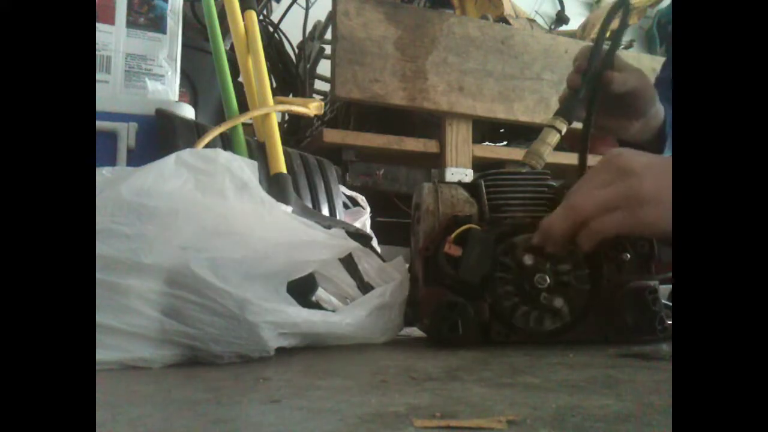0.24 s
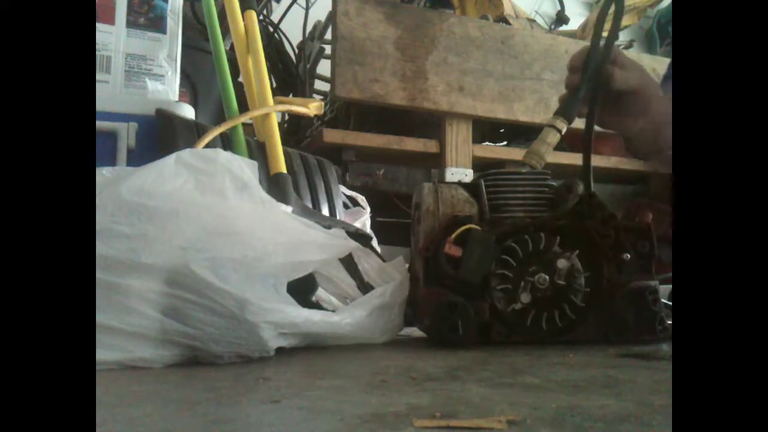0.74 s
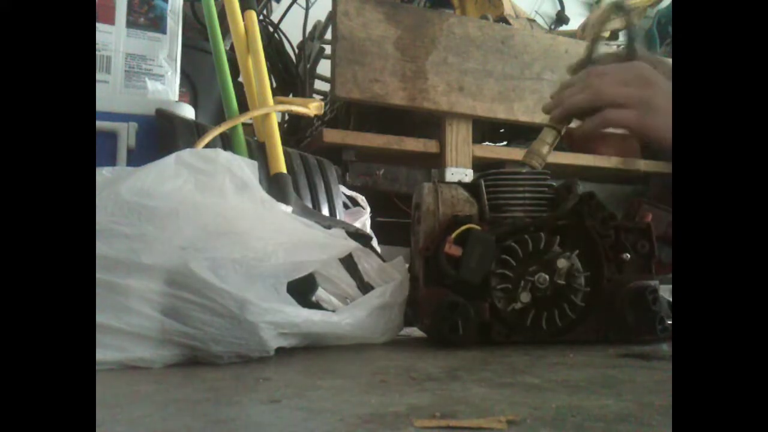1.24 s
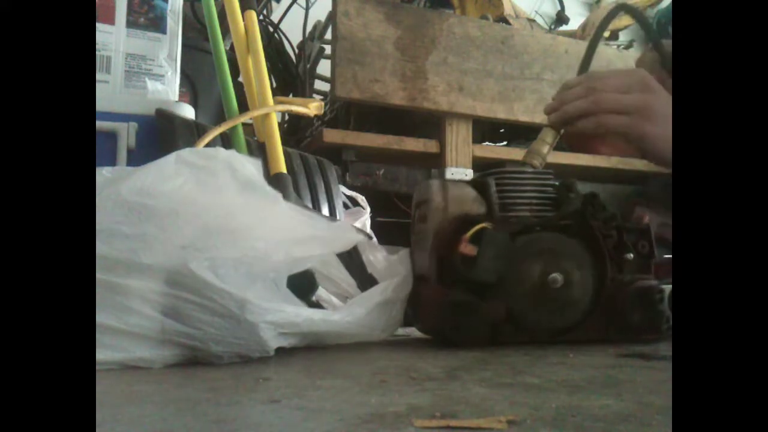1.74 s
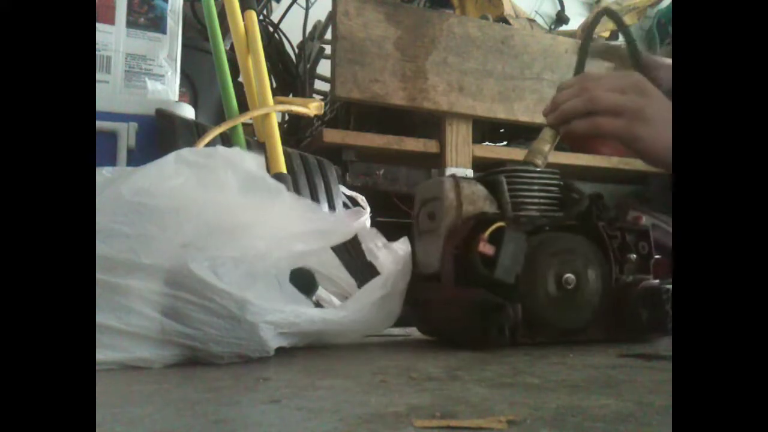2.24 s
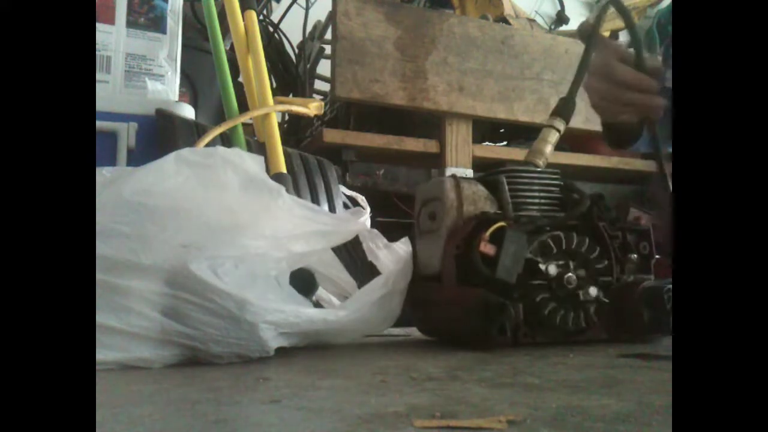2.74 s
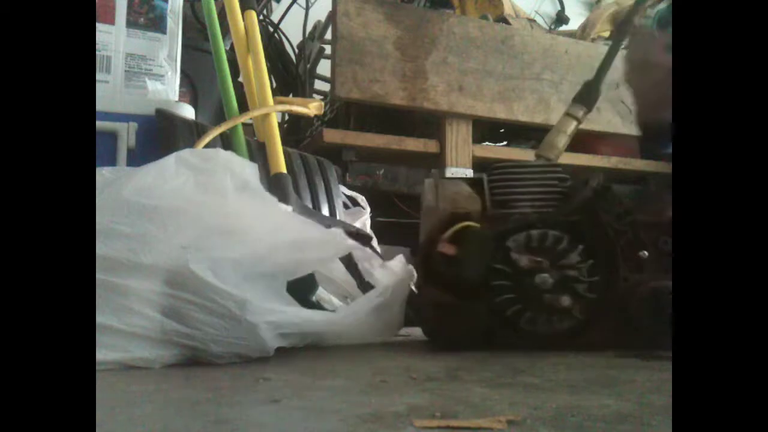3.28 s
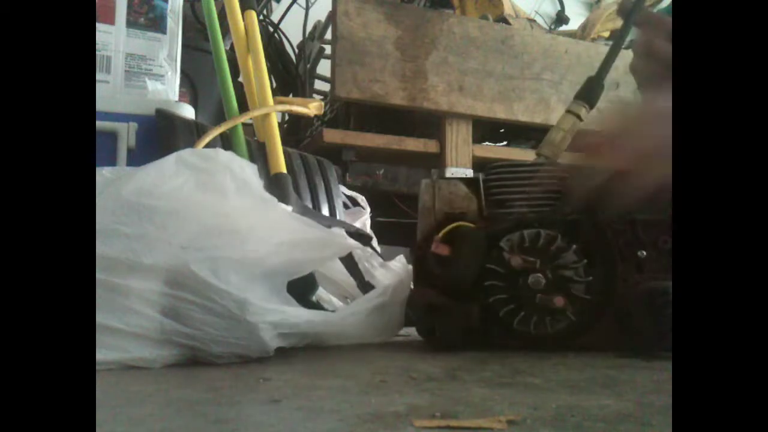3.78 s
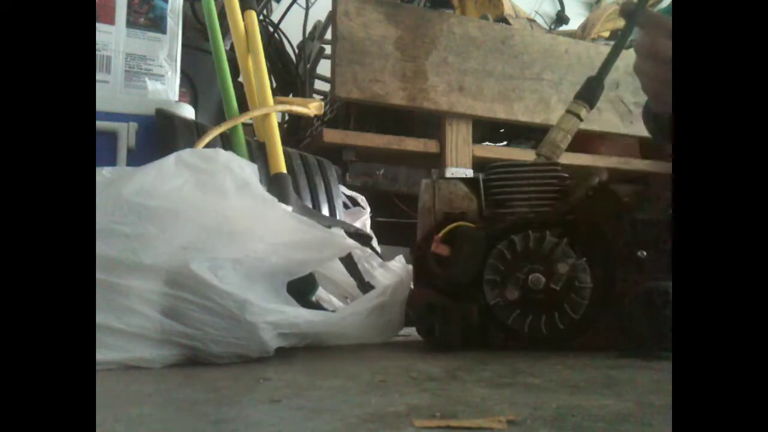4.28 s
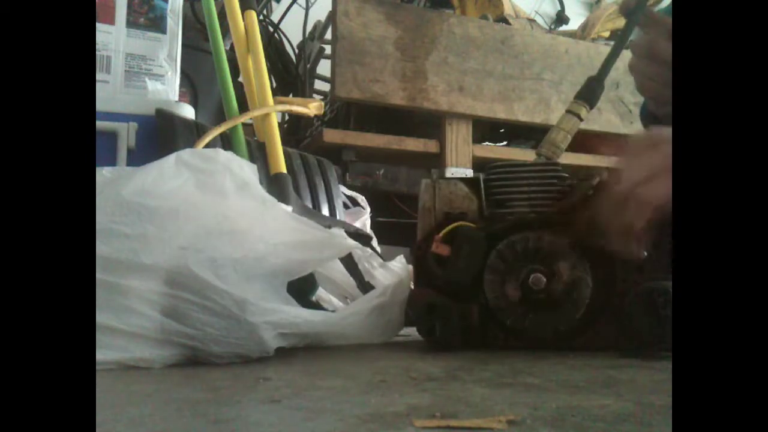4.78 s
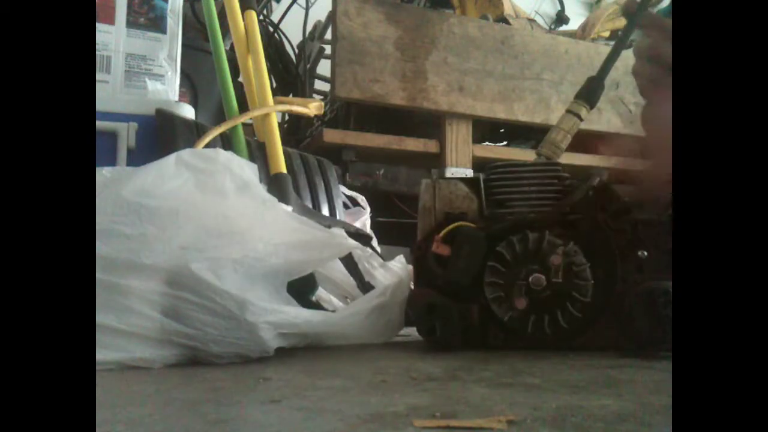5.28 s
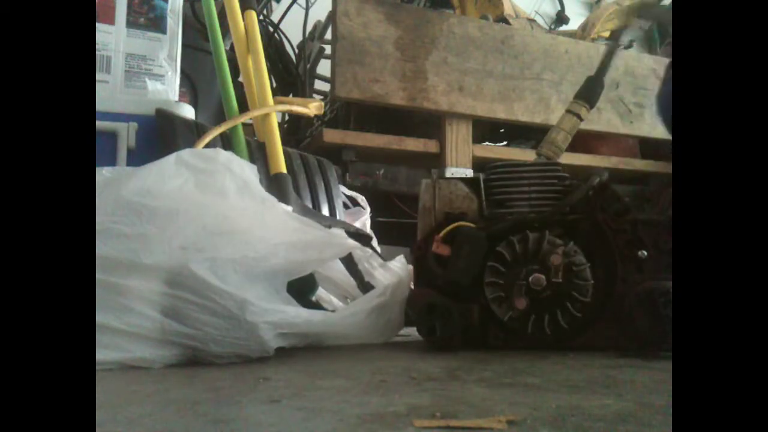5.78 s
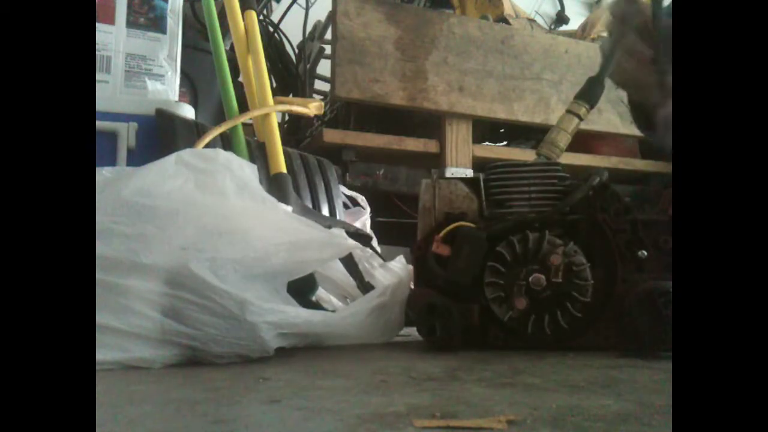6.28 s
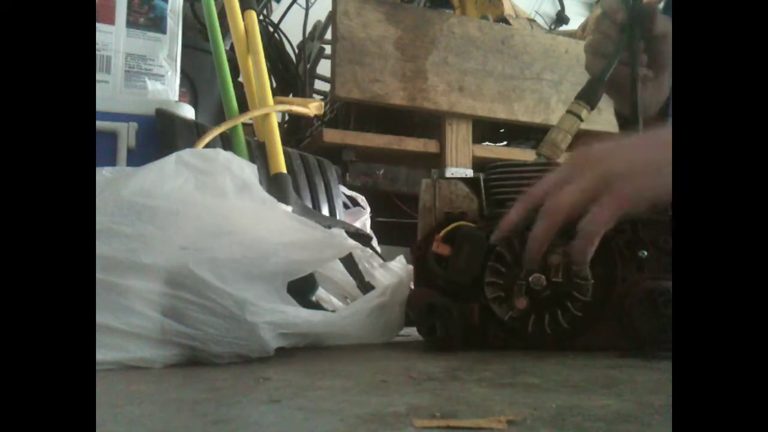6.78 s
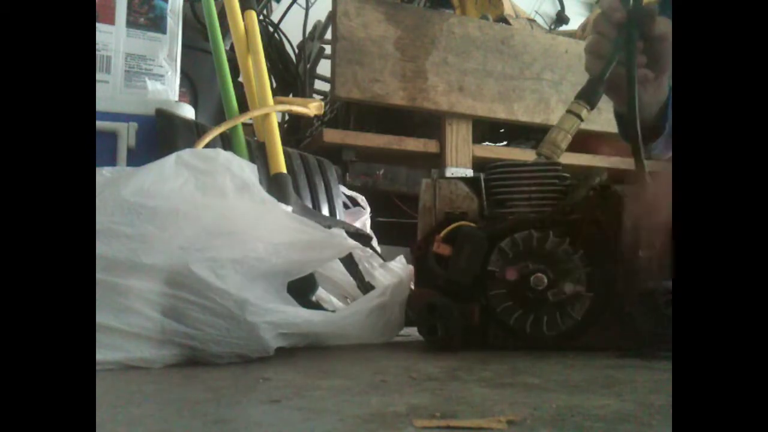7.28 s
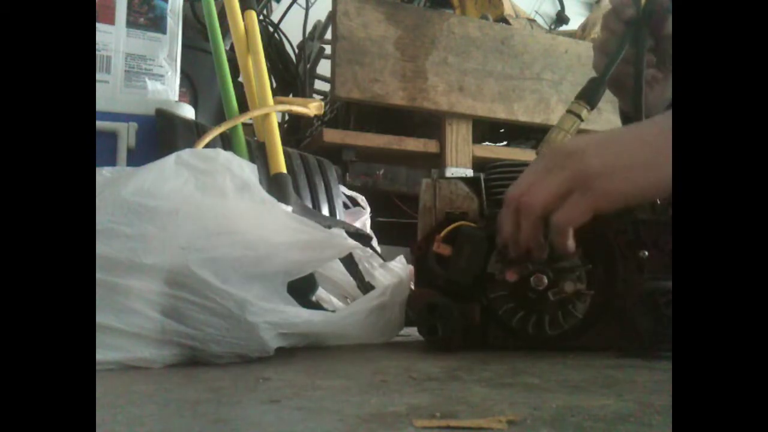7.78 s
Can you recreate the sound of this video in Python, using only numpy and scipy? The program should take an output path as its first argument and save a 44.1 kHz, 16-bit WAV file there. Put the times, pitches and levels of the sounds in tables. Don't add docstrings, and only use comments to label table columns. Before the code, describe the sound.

Compressed air spins a small engine in rapid chuffing puffs that clatter on the floor and stall, then long hissing gusts, flicks and metallic pings.

```python
import sys
import numpy as np
from scipy import signal
from scipy.fft import rfft, irfft, next_fast_len
from scipy.io import wavfile
from scipy.ndimage import uniform_filter1d

SR = 44100
rng = np.random.default_rng(int(sys.argv[2]) if len(sys.argv) > 2 else 0)


def generate_wav(sig):
    pcm = np.round(np.clip(np.atleast_2d(sig).T, -1, 1) * 32767).astype(np.int16)
    wavfile.write(sys.argv[1], SR, pcm)


def undo_db(level):
    steps = np.asarray(level, float) / 20
    return 10 ** steps


N = 354123
TIME = np.arange(N) / SR
HZ = np.fft.rfftfreq(next_fast_len(N), 1 / SR) + 1e-3


def unit(x):
    return x / np.sqrt(np.mean(x ** 2))


def colour(points):
    hz, db = np.transpose(points)
    return undo_db(np.interp(np.log(HZ), np.log(hz), db))


def above(hz, steep=6):
    return 1 / np.sqrt(1 + (hz / HZ) ** steep)


def below(hz, steep=6):
    return np.sqrt(1 - above(hz, steep) ** 2)


def noise(gain):
    size = next_fast_len(N)
    return unit(irfft(rfft(rng.standard_normal(size)) * gain, size)[:N])


def hiss_burst(t):
    return rng.standard_normal(len(t))


def band(x, hz, q):
    return signal.lfilter(*signal.iirpeak(min(hz, .45 * SR), q, fs=SR), x)


def walk(rate, count=N):
    hold = int(SR / rate)
    levels = rng.standard_normal(count // 64)
    steps = levels[np.arange(count) // hold]
    return unit(uniform_filter1d(uniform_filter1d(steps, hold), hold))


def bump(t, middle, half):
    return np.exp(-((t - middle) / half) ** 2)


def fade(t, t60):
    return np.exp(-np.log(1000) * t / t60)


def add(out, s, x):
    i = int(s * SR)
    out[i:i + len(x)] += x[:N - i]


def shed(x, db, dull_hz):
    t60_s, treble_t60_s, first_echo_s = .65, .3, .004
    t = TIME[:SR]
    dull = signal.lfilter(*signal.butter(1, dull_hz, fs=SR), rng.standard_normal(SR)) * fade(t, t60_s)
    bright = .4 * rng.standard_normal(SR) * fade(t, treble_t60_s)
    tail = (dull + bright) * (t > first_echo_s)
    return x + undo_db(db) * signal.fftconvolve(x, tail / np.sqrt(np.sum(tail ** 2)))[:N]


# frequency [Hz], level per Hz [dB].
QUIET_COLOUR = [(15, -54.5), (25, -24.5), (70, -21), (174, -1), (437, -5.5), (791, -5.5), (857, -3.5),
                (1190, -9), (3310, -15.5), (14600, -13.5), (15800, -23.5)]


def quiet():
    level_db, split_hz = -63.5, 1500
    shape = colour(QUIET_COLOUR)
    swell = undo_db(1.2 * walk(3) + 1.2 * walk(15))
    rumble = noise(shape * below(split_hz, steep=1.8)) * swell
    hiss = undo_db(-.5) * noise(shape * above(split_hz, steep=1.8))
    return undo_db(level_db) * unit(rumble + hiss)


# middle [s], level [dB], half length [s], centre [Hz].
BRUSH_PASSES = [(.2, -70, .2, 6000), (0.219, -60.5, 0.055, 9000), (.39, -64.5, 0.066, 11000),
                (1.199, -67.5, .1, 4960), (6.65, -71, .03, 9050), (7.076, -54, .025, 10000),
                (7.16, -63, .03, 9000), (7.44, -63, .03, 9000), (7.95, -67, 0.076, 10000)]


def brushes():
    out, t = np.zeros(N), TIME[:SR // 2]
    lead_s = .2
    for s, db, half, hz in BRUSH_PASSES:
        rub = band(band(hiss_burst(t), hz, .8), hz, .8)
        add(out, s - lead_s, undo_db(db + 5) * rub * bump(t, lead_s, half))
    return out


# start [s], peak [dB], centre [Hz].
BARE_TICKS = [(0.2114, -46, 8130), (0.3524, -44, 7850), (0.4449, -31, 7570), (0.7996, -37, 7520),
              (2.5855, -43, 10900), (2.5974, -42, 7950), (2.6114, -45, 10590), (6.4522, -46, 8690),
              (6.4875, -50, 10000), (6.992, -26, 11900), (7.1874, -36, 12000), (7.636, -45, 7000),
              (7.8136, -43, 7000), (7.8261, -32, 5500)]


def ticks():
    out, t = np.zeros(N), TIME[:SR // 2]
    for s, db, hz in BARE_TICKS:
        add(out, s, undo_db(db - 1) * band(hiss_burst(t) * fade(t, .0065), hz, 1.2))
    return out


# start [s], peak [dB], pitch [Hz].
KNUCKLE_KNOCKS = [(0.453, -21, 1516), (0.542, -28, 1540), (1.306, -35, 1540), (1.394, -19, 1690),
                  (2.404, -18, 1943), (2.479, -24, 1550), (2.557, -39, 1285), (4.736, -28.5, 1645),
                  (4.797, -27.5, 1635)]
# start [s], peak [dB], pitch [Hz].
NAIL_RAPS = [(0.509, -26, 1510)]
# start [s], peak [dB], pitch [Hz].
FINGERTIP_THUDS = [(6.615, -43, 1680), (7.145, -54, 1670), (7.218, -29, 1770), (7.559, -35, 1750),
                   (7.796, -49, 2150)]
# multiple of the pitch [ratio], level [dB].
CASING_MODES = [(.67, -3.5), (.85, -4.5), (1.0, 1), (1.22, -3.5), (1.7, -6), (2.3, -11)]


def casing_touches():
    out, t = np.zeros(N), TIME[:SR // 2]
    knuckle, nail, fingertip = (1, -6, -20), (9.5, .6, -15), (-2.5, -6, -20)
    touches = [(*row, *knuckle) for row in KNUCKLE_KNOCKS]
    touches += [(*row, *nail) for row in NAIL_RAPS]
    touches += [(*row, *fingertip) for row in FINGERTIP_THUDS]
    for s, db, pitch_hz, tilt_db, crack_db, rattle_db in touches:
        ring = 0
        for multiple, mode_db in CASING_MODES:
            phase, detune = rng.random(2)
            hz = multiple * pitch_hz * (.95 + .1 * detune)
            level = undo_db(mode_db + tilt_db * np.log2(multiple))
            ring = ring + level * np.sin(2 * np.pi * (hz * t + phase)) * fade(t, .028 / multiple ** .48)
        crack = undo_db(crack_db) * band(band(hiss_burst(t), 2600, .5), 2600, .45) * fade(t, .03)
        rattle = undo_db(rattle_db + 6) * band(band(hiss_burst(t), 2300, .7), 2300, .7) * fade(t, .4)
        add(out, s, undo_db(db - 6.5) * (ring * np.minimum(t / .0011, 1) + crack + rattle))
    return out


# start [s], peak [dB].
FLOOR_SLAPS = [(.453, -40), (.511, -44), (.545, -47), (1.306, -48), (1.489, -23), (1.539, -24),
               (1.589, -22), (1.622, -25), (1.68, -18), (1.764, -11), (1.841, -17), (1.909, -25),
               (2.009, -21), (2.082, -24), (2.139, -27), (2.181, -21), (2.273, -27), (2.365, -27),
               (2.408, -32), (2.485, -34), (2.556, -43)]
# frequency [Hz], level [dB], t60 [s].
BASE_MODES = [(160, -12, .06), (260, -9, .05), (495, -2, .06), (740, -3, .045), (1050, -8, .03),
              (1220, -8, .03)]


def slaps():
    out, t = np.zeros(N), TIME[:SR // 8]
    for s, db in FLOOR_SLAPS:
        ring = 0
        for hz, mode_db, t60 in BASE_MODES:
            chance = rng.standard_normal()
            tone = np.sin(2 * np.pi * hz * (1 + .02 * chance) * t)
            ring = ring + undo_db(mode_db + 2.5 * chance) * tone * fade(t, t60)
        add(out, s, undo_db(db - 5.5) * ring * np.minimum(t / .004, 1))
    return out


# time [s], speed [turns per s].
FLYWHEEL_SPEED = [
    (1.394, 13.014),
    (1.694, 25.372),
    (1.764, 24.035),
    (2.277, 22.92),
    (2.5, 10.171),
]


def speed():
    port_lead_s = .003
    return np.interp(TIME + port_lead_s, *np.transpose(FLYWHEEL_SPEED), left=0, right=0)


def port(lag):
    rise, fall, sag, open_share = .11, .08, .4, .64
    turns = np.cumsum(speed()) / SR - lag
    angle = turns % 1
    opening = np.clip(angle / rise, 0, 1) * (1 - sag * angle)
    gate = opening / (1 + np.exp((angle - open_share) / fall))
    return np.maximum(turns, 0).astype(int), (gate - .5) * (speed() > 0)


# time [s], flow as level of the jet [dB].
VALVE_SQUEEZES = [
    [(1.3, -66), (1.36, -48), (1.396, -30), (1.47, -17), (1.75, -20), (2.27, -23), (2.365, -27.5),
     (2.42, -43), (2.51, -46)],
    [(2.83, -65), (2.885, -39.5), (2.95, -35.5), (3.03, -40), (3.11, -31), (3.2, -25.5), (3.29, -18.5),
     (3.55, -21), (3.665, -32)],
    [(3.665, -32), (3.75, -29), (4.04, -25.5), (4.17, -29), (4.28, -25), (4.39, -23.5), (4.49, -27),
     (4.9, -29), (5, -28)],
    [(5, -28), (5.32, -27.5), (5.53, -20), (6.01, -22.5), (6.06, -26), (6.13, -55)],
]
# middle [s], dip [dB], half length [s].
FLYWHEEL_FLICKS = [
    (4.711, -8, .012),
    (4.772, -9, .018),
    (4.845, -5, .04),
]


def air_flow():
    flow = 0
    for squeeze in VALVE_SQUEEZES:
        s, db = np.transpose(squeeze)
        flow = flow + undo_db(np.interp(TIME, s, db, left=-150, right=-150))
    dips_db = sum(db * bump(TIME, s, half) for s, db, half in FLYWHEEL_FLICKS)
    return flow * undo_db(dips_db) / undo_db(-25)


# frequency [Hz], level per Hz [dB].
AIR_COLOUR = [(24, -79.5), (40, -51), (75, -41), (175, -14), (362, -12), (488, -6), (553, -8.5), (1330, -9),
              (1620, -2), (4300, -15.5), (4640, -11), (5670, -14), (8670, -4.5), (12600, -1.5),
              (15800, -12.5)]
# frequency [Hz], width [Hz], lift [dB].
AIR_CAVITIES = [(495, 50, 3), (740, 80, 2.5), (1596, 90, 2), (2010, 70, 2), (2526, 220, 2), (3040, 110, 4),
                (3400, 130, -5), (4400, 130, -8), (4710, 170, 5), (5400, 200, -5), (6460, 400, 4),
                (7700, 300, -2.5), (8600, 600, 2.5)]


def air():
    usual_db, leak_db = -25, -69
    case_lag = .25
    chop_growth_db_per_turn, puff_scatter_db = .1, 1.3
    shape = colour(AIR_COLOUR)
    for hz, width, db in AIR_CAVITIES:
        shape = shape * undo_db(db / (1 + (2 * (HZ - hz) / width) ** 2))
    stalled = TIME >= VALVE_SQUEEZES[1][0][0]
    settled = TIME >= VALVE_SQUEEZES[2][0][0]

    jet = noise(shape * above(6000))
    port_band = shape * above(1250) * below(3400)
    exhaust = np.where(stalled, noise(port_band), noise(port_band * above(1600, steep=2)))
    crankcase = noise(shape * below(1250))
    muffler_band = above(3400) * below(6000)
    muffler = np.where(settled, noise(shape * muffler_band), noise(muffler_band))

    flow = air_flow()
    eddies_db = .35 * walk(25) + .8 * walk(300)
    gives_way = TIME > FLYWHEEL_SPEED[0][0] - .008
    # part, when heard, lag in turns, dB while turning, dB while stalled, dB per dB of flow, chop in dB
    parts = [(jet, 1, 0, 0, 0, 1, 10),
             (exhaust, gives_way, 0, -9, -10.5, 1.12, 12.5),
             (crankcase, gives_way, case_lag, -15.5, -15, 1.2, 8),
             (muffler, gives_way, 0, -14, -14.5, .7, 3.5)]
    blast = 0
    for part, heard, lag, turning_db, stalled_db, slope, chop_db in parts:
        turn, gate = port(lag)
        scatter_db = puff_scatter_db * rng.standard_normal(32)[turn]
        lift_db = chop_db + chop_growth_db_per_turn * turn + scatter_db
        level_db = usual_db + np.where(stalled, stalled_db, turning_db)
        db = level_db + lift_db * gate + eddies_db + .55 * walk(40)
        blast = blast + flow ** slope * undo_db(db) * heard * part
    leak = undo_db(leak_db + 1.5 * walk(3)) * jet
    return shed(blast, db=-13.5, dull_hz=5500) + leak


def shake():
    force = uniform_filter1d((speed() / 24) ** 1.3, size=SR // 12)
    drumming = noise(above(125, steep=7) * below(230))
    return force * undo_db(-51.5 + 2.5 * walk(20)) * drumming


def lurch():
    return undo_db(-63) * bump(TIME, 2.43, .07) * noise(above(20) * below(60))


def squeak():
    start_s, length_s, hz, level_db = 4.79, .085, 4070, -38
    out, t = np.zeros(N), TIME[:SR // 8]
    held = np.clip(t / .004, 0, 1) * fade(t, .7) / (1 + np.exp((t - length_s) / .004))
    tone = np.sin(2 * np.pi * hz * t + .8 * walk(150, count=len(t)))
    add(out, start_s, undo_db(level_db + 1.1 * walk(120, count=len(t))) * tone * held)
    return out


# frequency [Hz], level per Hz [dB].
SPIT_SPECTRUM = [(59, -76), (100, -44.5), (568, -2.5), (850, -13), (905, -9.5), (1710, -12.5), (1940, -13),
                 (7220, -13), (15800, -31.5)]


def spit():
    start_s, level_db, bass_t60_s, treble_t60_s, split_hz = 6.72, -45, .55, .24, 4500
    t, shape = np.maximum(TIME - start_s, 0), colour(SPIT_SPECTRUM)
    bass = noise(shape * below(split_hz, steep=2)) * fade(t, bass_t60_s)
    treble = undo_db(1) * noise(shape * above(split_hz, steep=2)) * fade(t, treble_t60_s)
    return undo_db(level_db + 1.2 * walk(200)) * (bass + treble) * np.minimum(t / .0012, 1)


# frequency [Hz], level [dB], t60 [s].
FIN_PINGS = [
    (6.993, 1.8, [(470, -50, .1), (300, -54, .08), (4264, -52, .4), (4550, -54, .3), (4900, -50, .2), (5300, -54, .2), (7020, -60, .06), (9000, -56, .06), (11800, -35, 0.077), (12400, -48, .2)]),
    (7.07, .4, [(199, -60, 0.1)]),
    (7.192, .5, [(470, -58, .08), (4060, -61, .5), (4484, -56, .4), (5170, -53, 0.46), (6000, -52, .04), (8952, -58, .12), (12000, -44, .25), (12110, -40, .25)]),
    (7.636, .8, [(7000, -60, .07), (12300, -60, .1), (13400, -60, .05)]),
    (7.815, .9, [(7000, -59, .1), (13400, -64, .05)]),
    (7.826, 1.3, [(347, -58, .08), (3500, -64, .25), (4100, -63, .25), (5200, -65, .2), (7000, -59, 0.075), (9000, -60, 0.057), (12800, -57, .08)]),
]


def pings():
    out, t = np.zeros(N), TIME[:SR // 2]
    for s, rattle, modes in FIN_PINGS:
        ring = 0
        for hz, db, t60 in modes:
            level = undo_db(db + 3.5 * walk(180, count=len(t)))
            tone = np.sin(2 * np.pi * hz * t + rattle * walk(150, count=len(t)))
            ring = ring + level * tone * (fade(t, t60) + .8 * fade(t, .02))
        add(out, s, ring * np.minimum(t / .0015, 1))
    return out


def scene():
    handling = brushes() + ticks() + casing_touches() + slaps() + squeak() + pings()
    mono = quiet() + shed(handling, db=-18, dull_hz=2500) + air() + shake() + lurch() + spit()
    return np.array([mono, mono])


def roll_off(x):
    return signal.sosfilt(signal.butter(12, 15960, fs=SR, output="sos"), x)


def record(dry):
    rounded = np.tanh(.9 * dry) / .9
    thin = signal.sosfilt(signal.butter(2, 55, "high", fs=SR, output="sos"), rounded)
    cut = signal.sosfilt(signal.ellip(10, .2, 80, 15920, fs=SR, output="sos"), thin)
    return roll_off(cut)


dry = scene()
out = record(dry)
generate_wav(out)
```